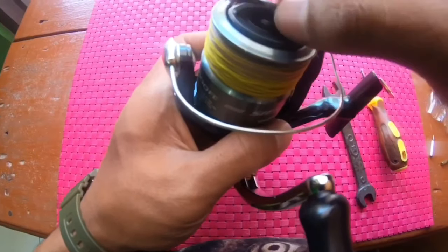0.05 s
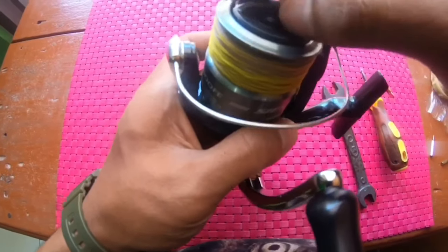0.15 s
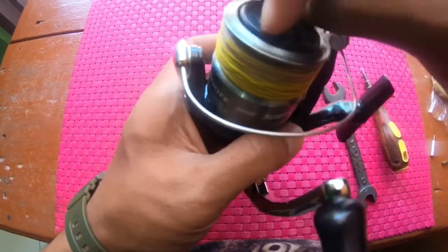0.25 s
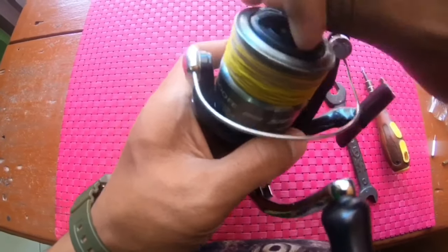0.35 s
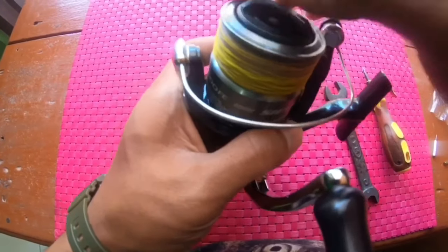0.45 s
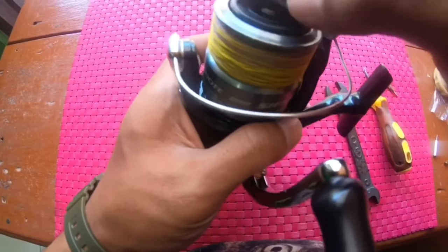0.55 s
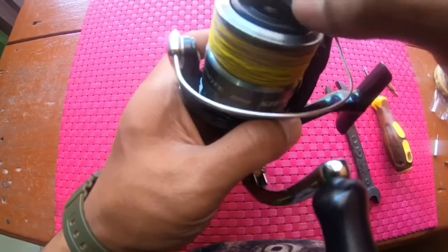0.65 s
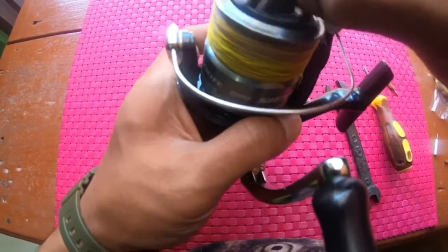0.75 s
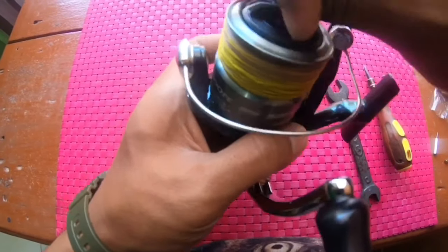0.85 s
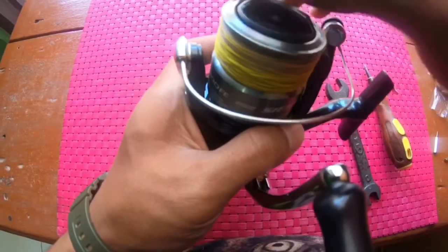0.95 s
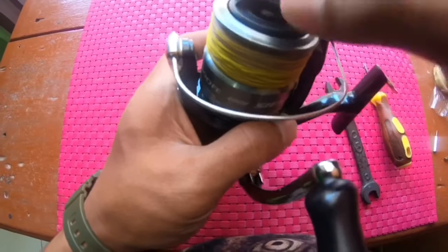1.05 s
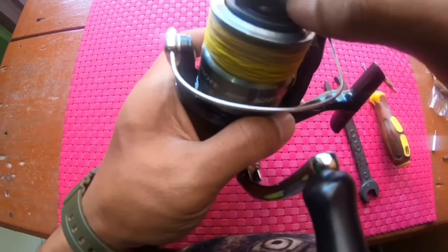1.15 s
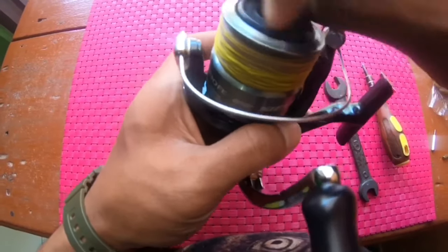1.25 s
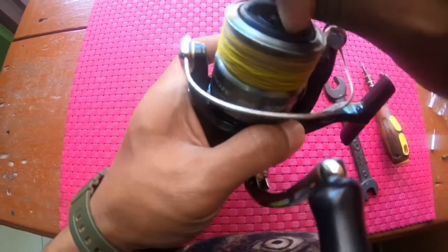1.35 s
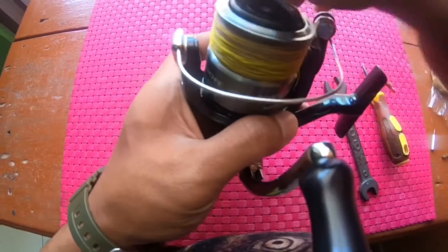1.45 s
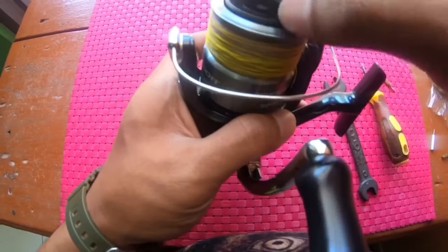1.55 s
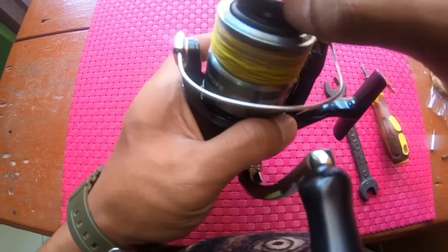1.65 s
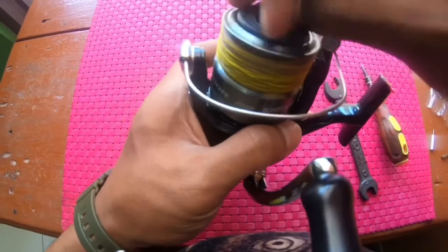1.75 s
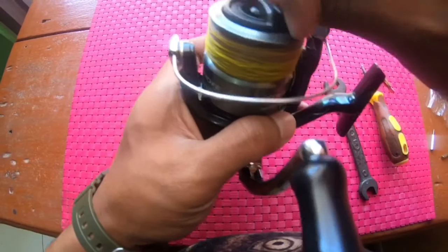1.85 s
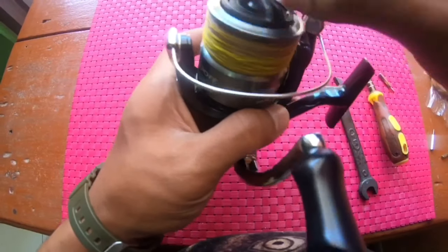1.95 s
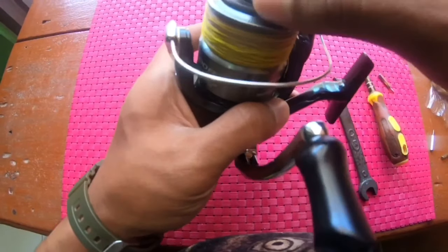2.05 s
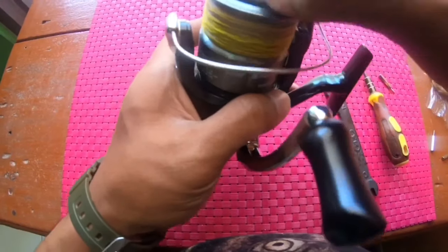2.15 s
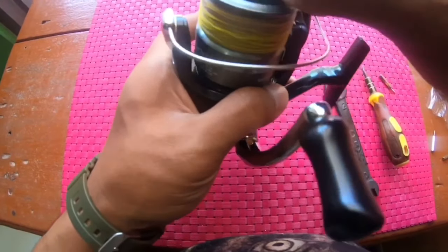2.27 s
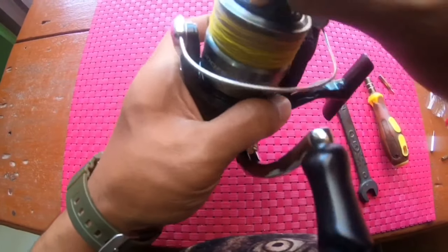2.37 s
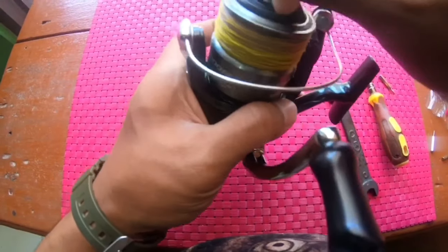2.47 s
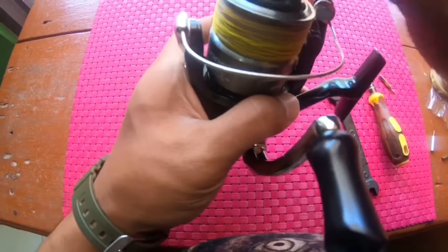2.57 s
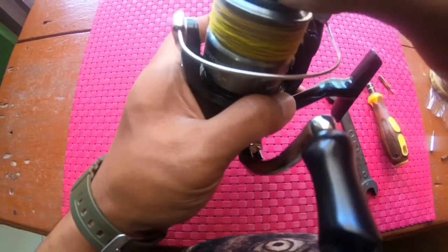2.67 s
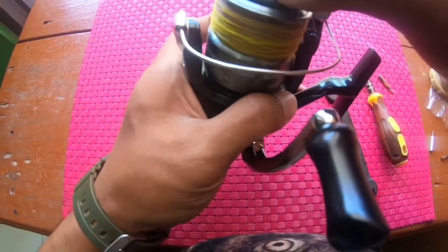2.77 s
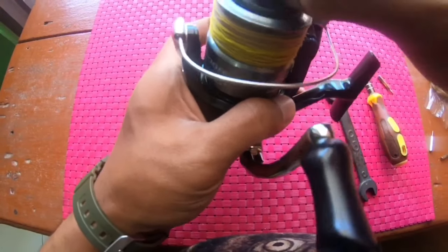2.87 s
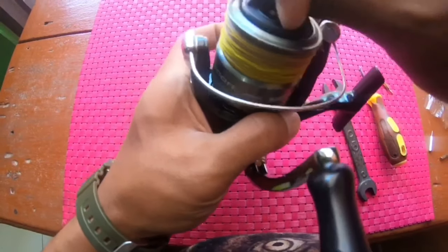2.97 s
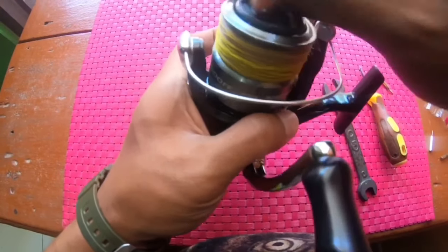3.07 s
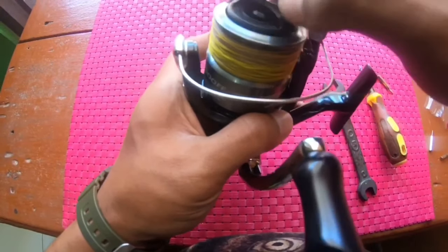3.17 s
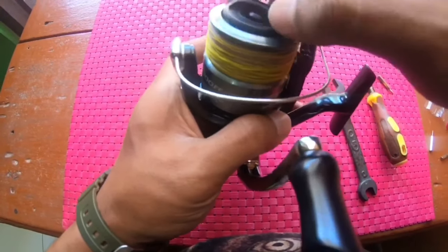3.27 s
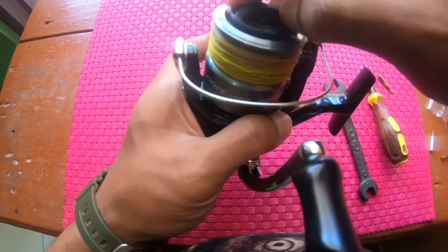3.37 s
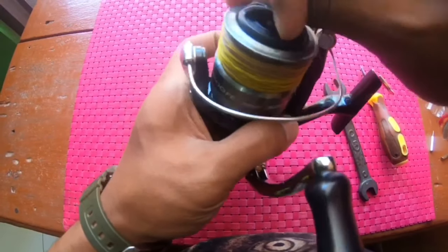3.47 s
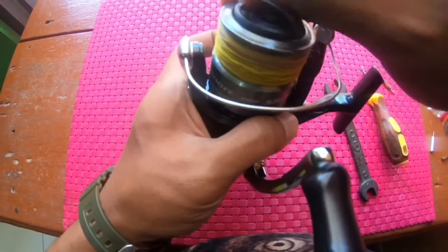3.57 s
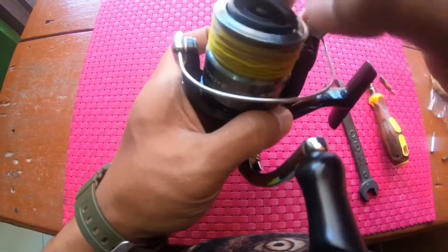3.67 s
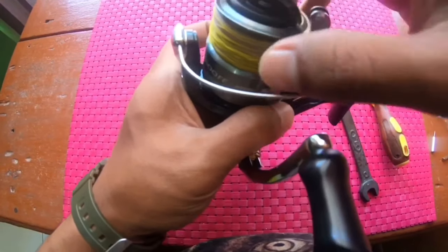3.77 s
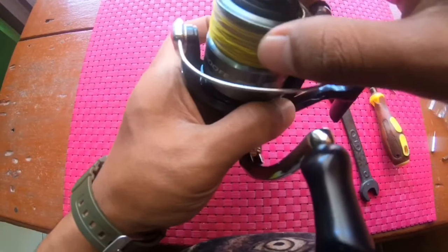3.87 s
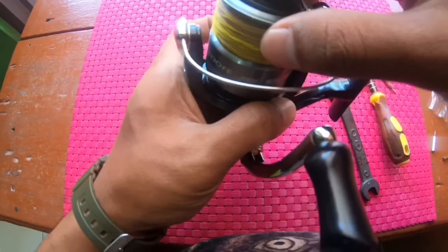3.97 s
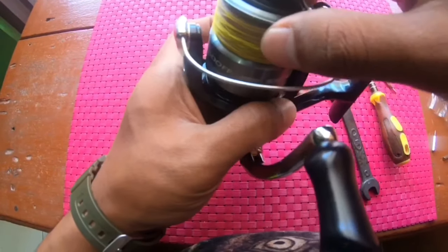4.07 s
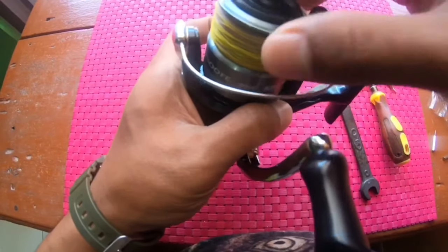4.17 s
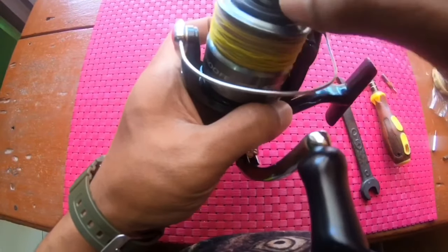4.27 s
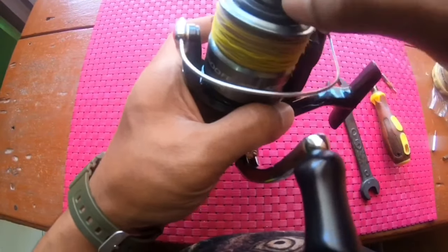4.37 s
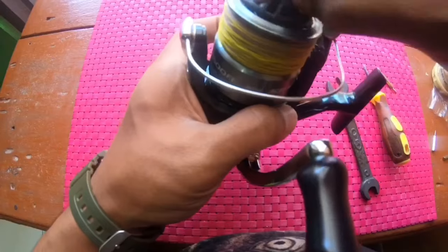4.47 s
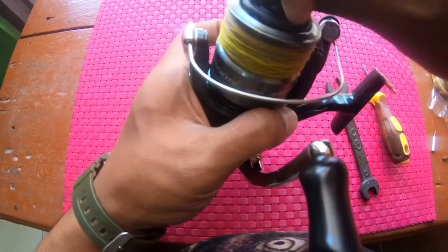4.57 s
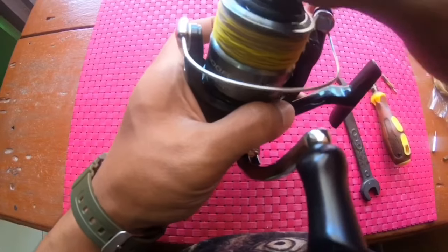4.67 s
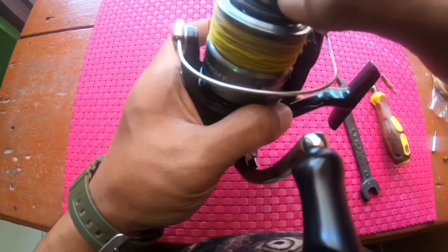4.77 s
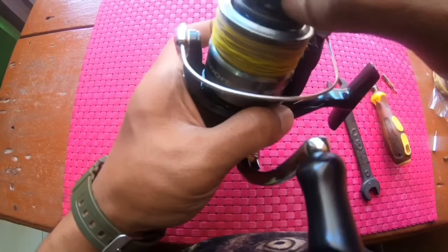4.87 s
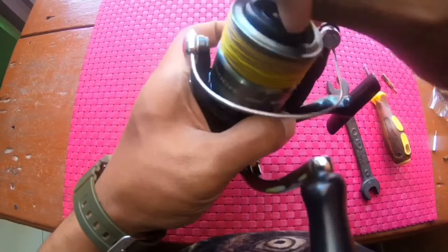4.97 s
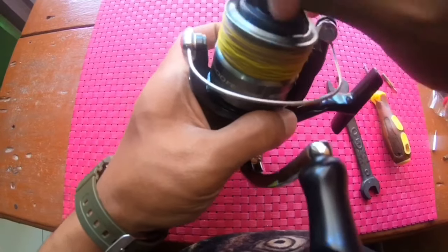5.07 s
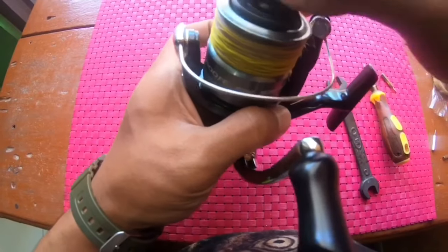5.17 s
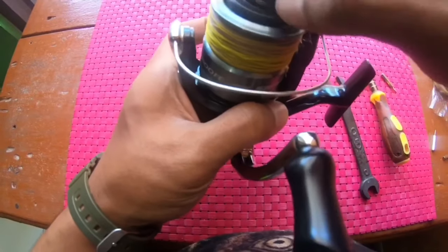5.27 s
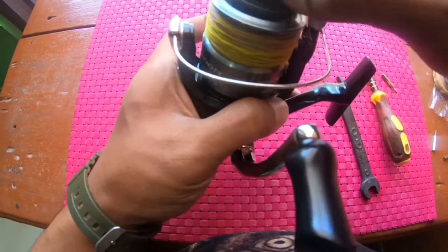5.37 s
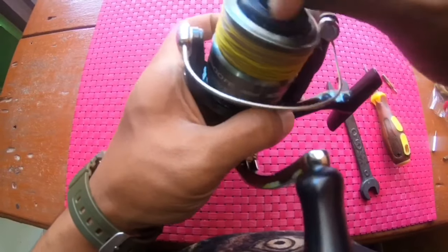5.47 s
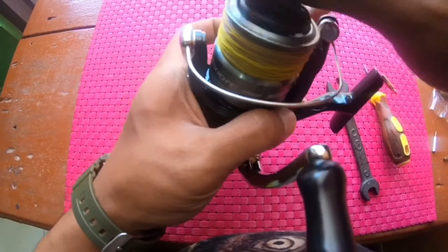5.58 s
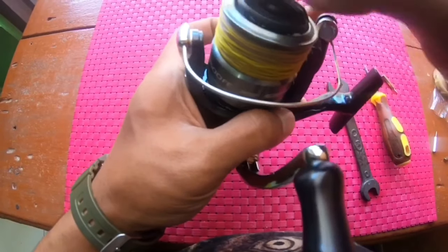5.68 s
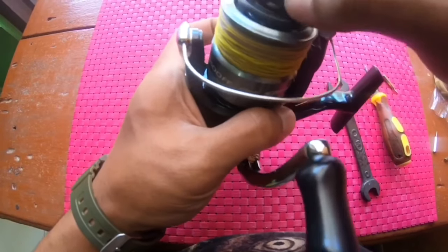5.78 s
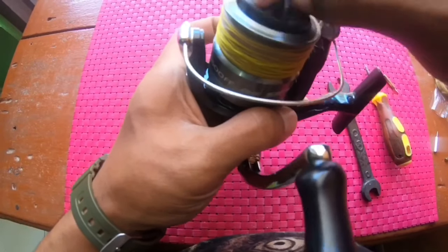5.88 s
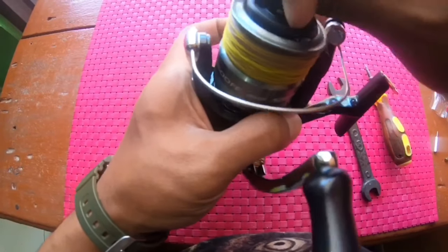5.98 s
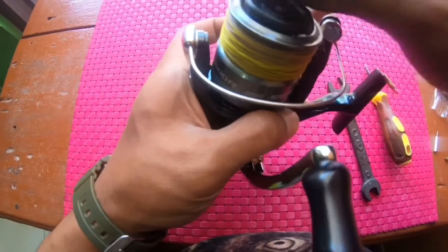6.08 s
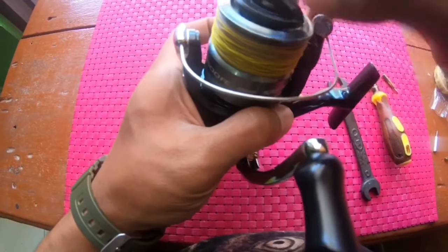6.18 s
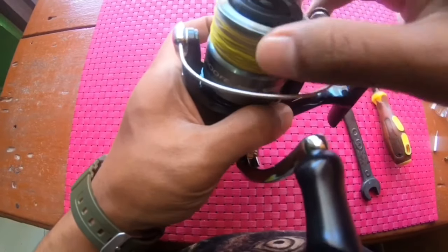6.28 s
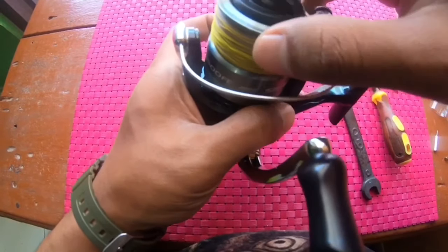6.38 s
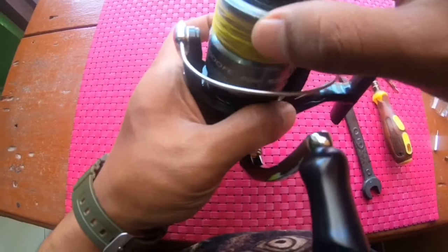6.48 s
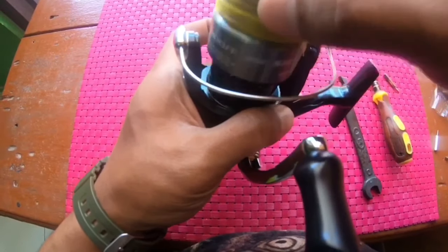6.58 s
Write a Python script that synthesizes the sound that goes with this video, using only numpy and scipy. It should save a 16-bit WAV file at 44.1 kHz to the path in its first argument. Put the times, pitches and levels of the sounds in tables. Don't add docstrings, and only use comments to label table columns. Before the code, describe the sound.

Close to a small stereo microphone, a hand twists a fishing reel's drag knob. Each twist is a fast burst of sharp, dry metallic clicks, about eight at a time, with short gaps holding faint finger taps and small knocks. A longer pause falls midway. A hard-walled room adds a faint reflection; low distant traffic and soft hiss continue beneath. Skin brushes the spool at the end.

```python
import sys
import numpy as np
from scipy import signal
from scipy.io import wavfile

SR = 44100
rng = np.random.default_rng(int(sys.argv[2]) if len(sys.argv) > 2 else 0)


def volts(x):
    e = np.asarray(x, float) / 20
    return 10 ** e


def generate_wav(sig):
    pcm = np.round(np.clip(np.atleast_2d(sig).T, -1, 1) * 32767).astype(np.int16)
    wavfile.write(sys.argv[1], SR, pcm)


N = 292481
LENGTH = 1024
TIME = np.arange(N) / SR
AGE = np.arange(LENGTH) / SR
LEFT_RIGHT = np.array([[1], [-1]])


def at_hz(points, hz, axis=1):
    points = np.array(points)
    return np.interp(np.log(hz), np.log(points[:, 0]), points[:, axis])


def drift(rate):
    knots = rng.standard_normal(400)
    return np.interp(TIME * rate, np.arange(400), knots)


def rms_one(x):
    return x / np.sqrt(np.mean(x ** 2))


def bandpass(x, order, low_hz, high_hz):
    return signal.sosfilt(signal.butter(order, [low_hz, high_hz], "band", fs=SR, output="sos"), x)


def bands(level, first_hz, last_hz, size=N):
    # frequency in Hz, likeness from -1 to 1.
    likeness = [(30, 0.92), (60, 0.93), (120, 0.95), (240, 0.99), (480, 0.7), (950, -0.24), (1890, 0.4),
                (3770, 0.91), (7520, 0.04), (15000, -0.29)]
    out = np.zeros((2, size))
    white = rng.standard_normal((2, 2, size))
    edges = 2 ** np.arange(np.log2(first_hz), np.log2(last_hz), 1 / 3)
    for k, (low_hz, high_hz) in enumerate(zip(edges, edges[1:])):
        mid, side = bandpass(white[k % 2], 2, low_hz, high_hz)
        hz = np.sqrt(low_hz * high_hz)
        alike = np.clip(at_hz(likeness, hz), -1, 1)
        out += level(hz) * (np.sqrt(1 + alike) * mid + np.sqrt(1 - alike) * side * LEFT_RIGHT)
    return out


def chatter(count, lasts_s, first):
    age = AGE[:160] / lasts_s
    grains = rng.standard_normal((count, 2, 160)) ** 3 * age * np.exp(-age)
    grains[:, 0, 0] = first
    return grains


def softened(contacts, share):
    return np.concatenate([contacts[:, :1], share * contacts[:, 1:]], axis=1)


def ports(pair, side):
    mid, across = (v / np.abs(v).max() for v in pair)
    return np.array([mid + side * across, mid - side * across])


def ring(contacts, hz, t60, side, swell):
    rise = 1 - np.exp(-(AGE / (swell + 1e-5)) ** 2)
    shape = np.sin(2 * np.pi * hz * AGE) * volts(-60 * AGE / t60) * rise
    return ports([np.convolve(c, shape[:LENGTH - len(c) + 1]) for c in contacts], side)


def crack(contacts, low_hz, high_hz, side):
    padded = np.pad(contacts, ((0, 0), (0, LENGTH - contacts.shape[1])))
    return ports(bandpass(padded, 2, low_hz, high_hz), side)


def add(out, s, sound):
    at = round(s * SR)
    out[:, at:at + LENGTH] += sound[:, :N - at]


def traffic():
    # time in seconds, level in dB.
    passing = [(0.0, -50), (0.35, -46.5), (0.39, -62), (1.0, -47), (1.62, -64), (2.07, -49), (2.14, -59),
               (4.01, -55), (4.6, -44), (4.71, -62), (5.02, -44.5), (5.15, -69), (5.56, -43), (5.65, -56),
               (6.09, -44), (6.63, -52.5)]
    # frequency in Hz, level in dB per Hz.
    rumble = [(12, -44), (20, -8.5), (46, 1), (65, 4), (92, -5.5), (157, -3.5), (200, -9.5), (252, -8.5),
              (500, -29), (650, -53), (1100, -120)]
    # lowest Hz, highest Hz, level in dB against the passing curve at -55 dB, share of its swing.
    parts = [
        (20, 66, -6, .8),
        (61, 100, -3, .9),
        (95, 520, 2.5, 0.26),
    ]
    s, passing_db = np.transpose(passing)
    swing_db = np.interp(TIME, s, passing_db) + 55

    def level(hz):
        return volts(at_hz(rumble, hz) + 3.0 * drift(7.6))

    out = np.zeros((2, N))
    for low_hz, high_hz, db, share in parts:
        out += volts(db - 55 + share * swing_db) * rms_one(bands(level, low_hz, high_hz))
    return out


def hiss():
    # frequency in Hz, level in dB per Hz.
    tone = [(250, -8.5), (400, -19.5), (600, -11.5), (1000, -16), (1900, -17.5), (4000, -23), (5500, -28),
            (8000, -27), (9500, -39), (11000, -47), (13500, -59)]

    def level(hz):
        return volts(at_hz(tone, hz) + 1.16 * drift(3.4))

    return volts(-59) * rms_one(bands(level, 312.3, 14000))


def far_notes():
    # time of the middle in seconds, pitch in Hz, level in dB, length in seconds.
    swells = [
        (.2, 54, -56, .5),
        (.3, 162, -55, .7),
        (.85, 110, -54, .45),
        (1.02, 54, -50, .55),
        (1.08, 135, -57, .45),
        (1.58, 165, -57, .45),
        (3.225, 3280, -70, .1),
        (3.31, 2410, -63, .035),
        (4.45, 112, -54, .5),
        (6.12, 66, -46, .6),
    ]
    out = np.zeros((2, N))
    for s, hz, db, length_s in swells:
        swell = np.cos(np.pi * np.clip((TIME - s) / length_s, -.5, .5))
        lag = .3 * rng.uniform(-1.5, 1.2) * LEFT_RIGHT
        wobbling_hz = hz * (1 + 0.0066 * drift(8.4))
        out += volts(db + 5.5) * swell * np.sin(2 * np.pi * np.cumsum(wobbling_hz) / SR + lag)
    return out


def clicker():
    # time in seconds, knob peak in dB, knob pitch in
    # Hz, spring level in dB.
    twist_snaps = [(0.2357, -15.5, 3780, -20.5), (0.2465, -21, 3550, -18.5), (0.2706, -20, 3330, -19),
                   (0.2761, -17, 3860, -15.5), (0.294, -17, 3710, -23.5), (0.3168, -22, 4000, -18),
                   (0.3339, -13, 3650, -25.5), (0.3476, -19.5, 3830, -20), (0.7533, -16.5, 3700, -21),
                   (0.7814, -12.5, 3640, -20.5), (0.7924, -11, 3700, -24), (0.8181, -13, 3660, -21),
                   (0.83, -12.5, 3670, -25), (0.8445, -11, 3780, -22), (0.8628, -11.5, 3520, -27),
                   (0.8744, -16.5, 3720, -21), (0.9003, -11, 3750, -24), (1.226, -14.5, 3830, -17.5),
                   (1.2403, -11, 3660, -23.5), (1.27, -8.5, 3740, -21), (1.2796, -12, 3580, -26),
                   (1.2909, -13.5, 3700, -20), (1.3071, -18.5, 3740, -20.5), (1.3188, -12.5, 3670, -21),
                   (1.326, -10.5, 3800, -24),
                   (1.7179, -9, 3640, -26.5), (1.7332, -9.5, 3650, -27.5), (1.7466, -7, 3730, -27),
                     (1.7605, -12, 3740, -28), (1.7897, -14, 3620, -17), (1.8065, -18.5, 3820, -26),
                     (1.8218, -10, 3720, -20), (2.275, -14.5, 3730, -19.5), (2.3481, -11.5, 3200, -25),
                     (2.3564, -14.5, 3300, -16), (2.3649, -16.5, 3630, -19), (2.381, -14, 4010, -23.5),
                     (2.394, -17, 3950, -16.5), (2.4057, -11.5, 3480, -20.5), (2.4314, -15.5, 3640, -24),
                     (2.4625, -8.5, 3720, -30.5), (2.866, -10, 3650, -29), (2.8785, -13.5, 3490, -25),
                     (2.9022, -8.5, 3660, -26), (2.9116, -18, 3800, -27), (2.943, -16.5, 3730, -24),
                     (2.9587, -13.5, 3570, -22), (2.9666, -20, 3780, -41), (2.9741, -12, 3640, -19.5),
                     (2.9865, -16.5, 3460, -20), (2.9991, -15.5, 3540, -22.5),
                   (3.377, -9, 3720, -23.5), (3.3906, -10.5, 3650, -23.5), (3.4188, -13, 3720, -20.5),
                     (3.4284, -15.5, 3430, -20.5), (3.4505, -15.5, 3700, -19.5), (3.4636, -13, 3620, -25),
                     (3.4789, -14, 3300, -30), (3.488, -10.5, 3520, -21.5), (3.4947, -14.5, 3600, -29),
                     (4.4538, -8, 3670, -31), (4.4643, -11, 3650, -23.5), (4.4866, -9.5, 3660, -25),
                     (4.4969, -22.5, 3980, -20), (4.5247, -9, 3540, -28), (4.5381, -17.5, 3620, -18),
                     (4.5501, -9.5, 3630, -23), (4.5599, -17, 3420, -19.5), (4.574, -13, 3820, -20),
                   (4.9199, -12.5, 3320, -21), (4.9349, -12, 3280, -22.5), (4.9537, -14.5, 3700, -22.5),
                   (4.9648, -9.5, 3400, -26.5), (4.9804, -20, 3500, -19), (4.995, -11, 3420, -27),
                   (5.01, -9.5, 3470, -25), (5.0226, -13.5, 3720, -27.5), (5.4092, -10.5, 3700, -24.5),
                   (5.4288, -12.5, 3490, -24), (5.439, -13.5, 3630, -21.5), (5.4485, -20, 3350, -28),
                   (5.4638, -16.5, 3490, -22.5), (5.4847, -15.5, 3650, -23), (5.5058, -13.5, 3570, -21),
                   (5.5188, -18, 3900, -19), (5.5355, -11.5, 3990, -22.5), (5.9071, -13, 3500, -21.5),
                   (5.9168, -12, 3320, -21), (5.9236, -17, 3520, -25), (5.9422, -7.5, 3270, -32),
                   (5.9618, -13.5, 3010, -25), (5.9881, -11.5, 3750, -30.5), (6.008, -9.5, 3790, -24),
                   (6.0265, -11, 3720, -24.5)]
    # pitch in Hz, level in dB, time to fall 60 dB in seconds, left-right difference as a share.
    body = [(241, -37.5, 0.013, 1.5), (1277, -26.5, 0.028, 0.5), (1770, -22, 0.012, 0.6),
            (2467, -13, 0.0075, 0.4), (3700, -18.5, 0.018, 0.1), (4790, -16, 0.0078, 0.5),
            (6430, -9, 0.0049, 0.4), (7330, -23, .012, 2.43), (7640, -14.5, 0.0059, .8),
            (9180, -17.5, 0.0042, 0.8), (12470, -21.5, 0.0028, .9), (15400, -30.5, 0.0032, .8)]
    snaps = twist_snaps
    out = np.zeros((2, N))
    spread = rng.standard_normal((len(snaps), len(body) + 1, 2))
    blows = chatter(len(snaps), 0.00041, first=5.26)
    for (s, knob_db, knob_hz, spring_db), contacts, luck in zip(snaps, blows, spread):
        place, turn = luck[-1]
        spring_db = spring_db + 4.5
        blow_db = .5 * (knob_db + spring_db) + 3.0

        spring_hz = 7540 + 320 * np.clip(place, -1.5, 1.5)
        pan_db = np.clip(5.5 + 6.5 * turn, -8, 8)
        spring = volts(spring_db) * ring(contacts, spring_hz, 0.0022, side=0.15, swell=0.00049)
        spring += volts(spring_db - 9.5) * crack(contacts, 9000, 18000, side=0.62)
        sound = spring * volts(.5 * pan_db * LEFT_RIGHT)

        knob_contacts = softened(contacts, share=0.21)
        sound += volts(knob_db) * ring(knob_contacts, knob_hz, 0.0036, side=0.077, swell=0.0011)
        sound += volts(blow_db - 21.5) * crack(contacts, 1500, 6800, side=.3)
        sound += volts(blow_db - 29.5) * crack(contacts, 280, 1500, side=.8)

        for (hz, db, t60, side), (strength, grip) in zip(body, luck):
            shifted_hz = hz * (1 + 0.045 * grip)
            part_db = blow_db + db + 1.9 * strength
            sound += volts(part_db) * ring(contacts, shifted_hz, t60, side=side, swell=0.00038)
        add(out, s, sound)
    return out


def taps():
    # time in seconds, peak in dB, pitch in Hz,
    # hardness in dB (above 0 gives a brighter tick, below 0 more hollow note).
    finger_taps = [(0.624, -43.5, 3830, -2), (0.7054, -42.5, 3930, 1.5), (0.735, -38, 3850, 20),
                   (1.133, -26, 2530, 5), (1.136, -28, 3480, 14), (1.4204, -37.5, 3850, 9),
                   (1.4469, -32.5, 3900, 11), (1.618, -36, 2580, 5), (1.6254, -35.5, 3770, 7),
                   (1.8969, -32, 3700, 24.5), (1.9263, -32, 2650, 5), (1.944, -39, 2500, 4),
                   (2.1074, -47, 3730, -27), (2.1641, -38, 4000, 19), (2.6874, -37, 2440, -5),
                   (2.702, -40, 3980, -6.5), (3.985, -40, 2380, -8), (3.9964, -44, 3420, -29),
                   (4.1542, -44, 3610, -13), (4.1625, -34.5, 2490, 15), (4.4038, -39.5, 3120, 4),
                   (4.8185, -32.5, 3260, -5), (5.1067, -39.5, 3220, -4), (5.129, -36.5, 2660, -6),
                   (5.167, -36, 2540, 0.5), (5.2752, -38, 2640, -6.5), (5.336, -43, 3110, 5),
                   (5.662, -39.5, 3630, -8), (6.5171, -38, 3340, -14), (6.601, -39, 2620, -7)]
    # time in seconds, peak in dB, pitch in Hz.
    faint_taps = [(0.42, -47.5, 3900), (1.607, -41, 3040), (1.6383, -43, 3340), (2.5355, -41.5, 3920),
                  (3.175, -46, 3300), (3.593, -42.5, 3100), (3.9571, -45, 2700), (4.412, -47, 3780),
                  (4.425, -48, 3520), (4.444, -45, 3600), (6.092, -43, 3130), (6.355, -48, 3200),
                  (6.3902, -45, 2490)]
    out = np.zeros((2, N))
    rows = finger_taps + [(*row, 0) for row in faint_taps]
    for (s, db, hz, hard_db), contacts in zip(rows, chatter(len(rows), 0.0015, first=5.9)):
        clean = softened(contacts, share=0.21)
        sound = volts(0.5) * ring(clean, hz, 0.0045, side=0.11, swell=0.00027)
        sound += volts(2.5) * crack(clean, 2300, 4400, side=0.2)
        sound += volts(-11 + .5 * hard_db) * crack(clean, 4400, 7100, side=0.56)
        sound += volts(-16 - .5 * hard_db) * ring(contacts, 1267, .015, side=.4, swell=0.0012)
        add(out, s, volts(db) * sound)
    return signal.sosfilt(signal.butter(3, 9500, fs=SR, output="sos"), out)


def room(x):
    # frequency in Hz, level in dB, time to fall 60 dB in seconds.
    walls = [(700, 2.5, .5), (2000, -3, 0.32), (3830, -7, 0.38), (7500, -2, 0.45), (12000, 3, 0.22),
             (16080, -9, .3)]
    age = np.arange(SR // 2) / SR - 0.0044

    def level(hz):
        return volts(at_hz(walls, hz) - 60 * age / at_hz(walls, hz, axis=2)) * (age > 0)

    echo = bands(level, 511, 19000, size=len(age))
    return volts(-48.5) * signal.fftconvolve(x.mean(0)[None], echo, axes=1)[:, :N]


def skin_rub():
    start_s, attack_s, start_db, fade_db_per_s = 6.29, 0.055, -58.5, 15
    grain_db = 1.5 * drift(50.)
    rub = bandpass(rng.standard_normal((2, N)), 3, 3200, 8500)
    age = TIME - start_s
    attack = np.clip(age / attack_s, 0, 1) ** 2
    stroke = attack * volts(start_db - fade_db_per_s * np.maximum(age, 0))
    return stroke * volts(grain_db) * rms_one(rub)


def scene():
    background = traffic() + hiss() + far_notes()
    reel = clicker() + taps()
    near = reel * volts(.5 * 1.5 * LEFT_RIGHT)
    return background + near + room(reel) + skin_rub()


def low_pass(x):
    return signal.sosfilt(signal.butter(12, 16970, fs=SR, output="sos"), x)


def record(dry):
    rounded = .9 * np.tanh(dry / .9)
    cut = signal.sosfilt(signal.cheby2(12, 60, 17000, fs=SR, output="sos"), rounded)
    return low_pass(cut)


dry = scene()
out = record(dry)
generate_wav(out)
```